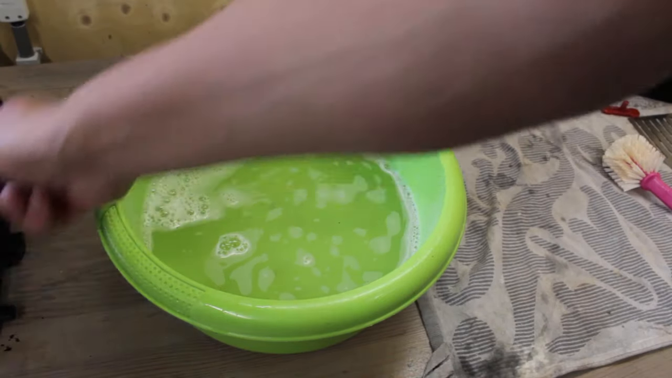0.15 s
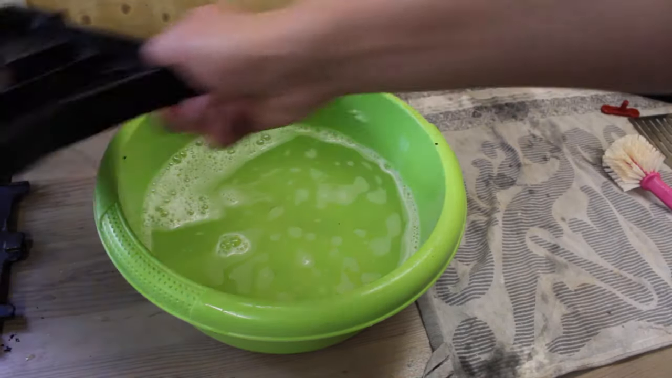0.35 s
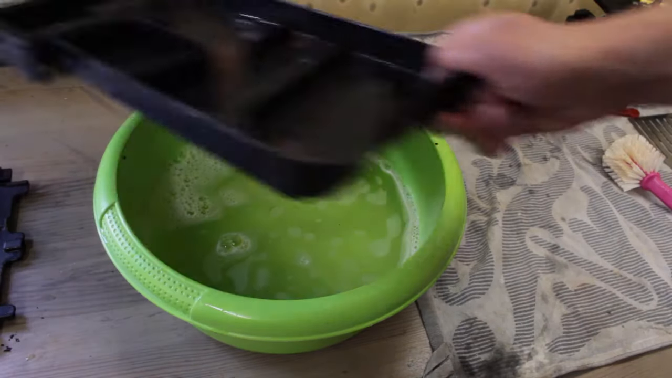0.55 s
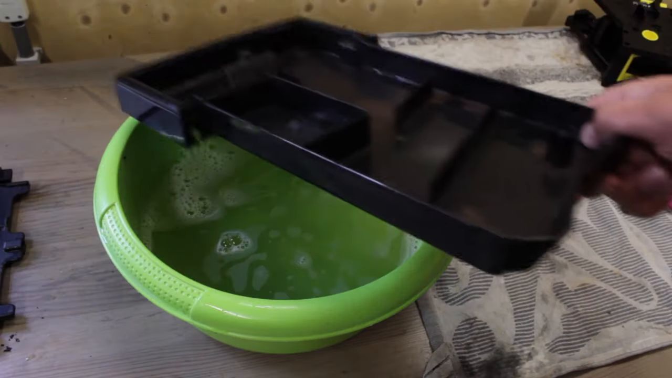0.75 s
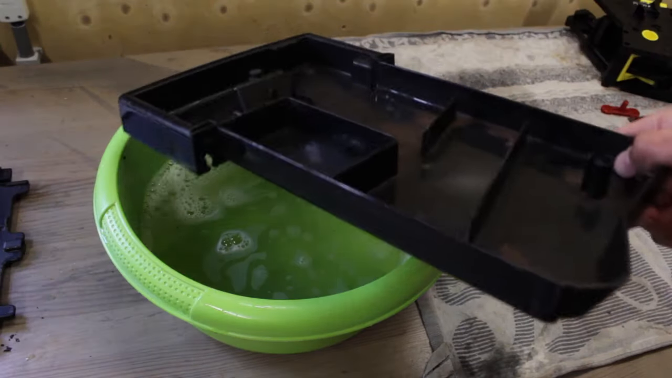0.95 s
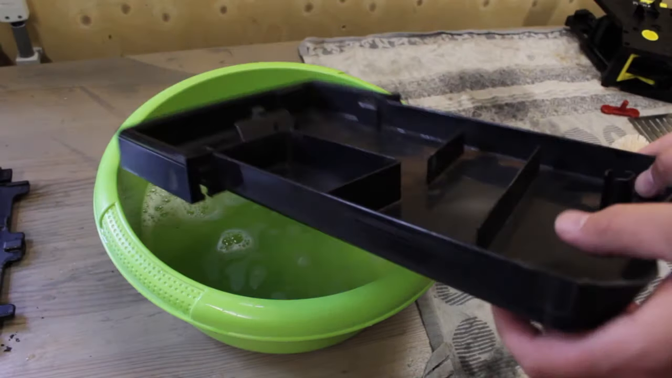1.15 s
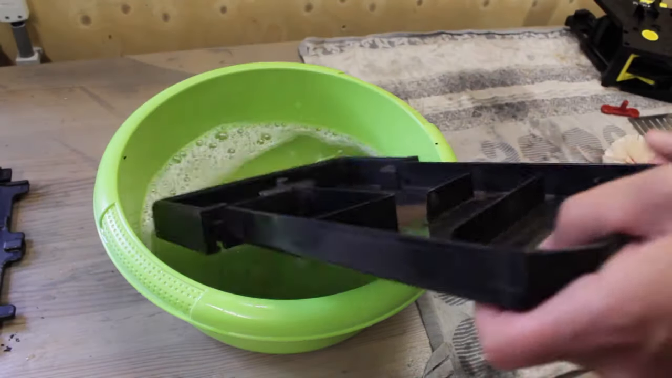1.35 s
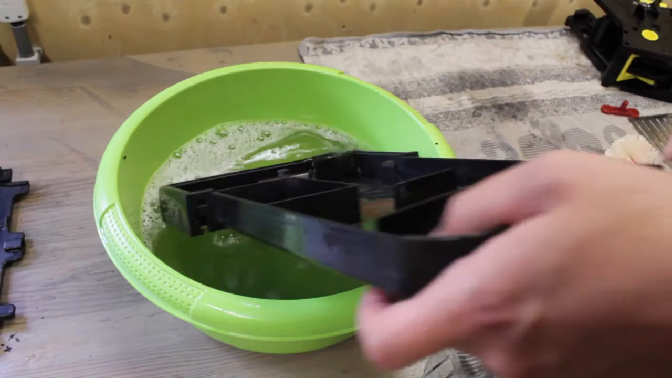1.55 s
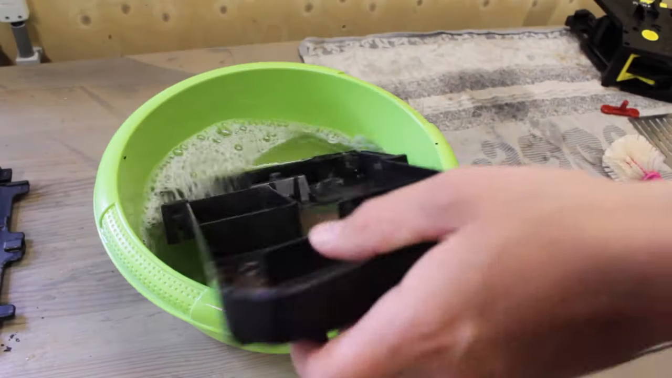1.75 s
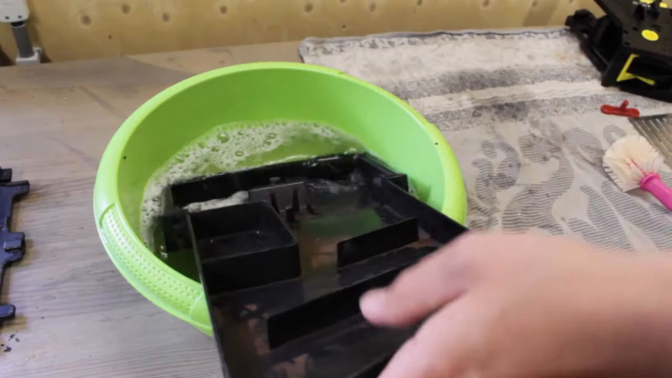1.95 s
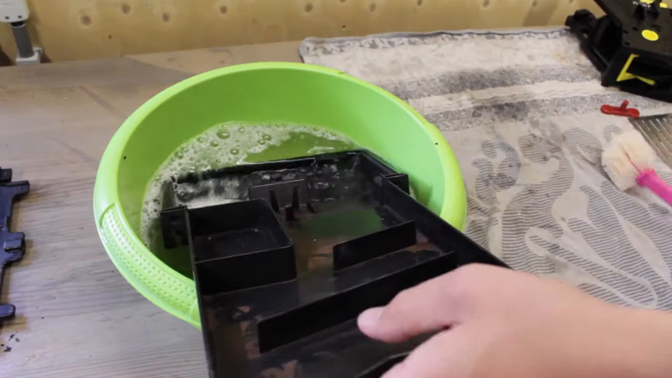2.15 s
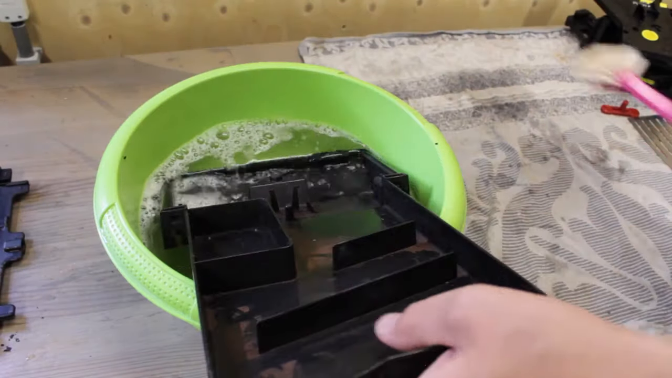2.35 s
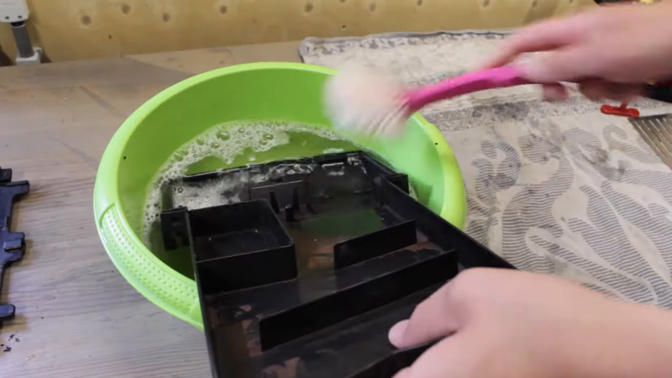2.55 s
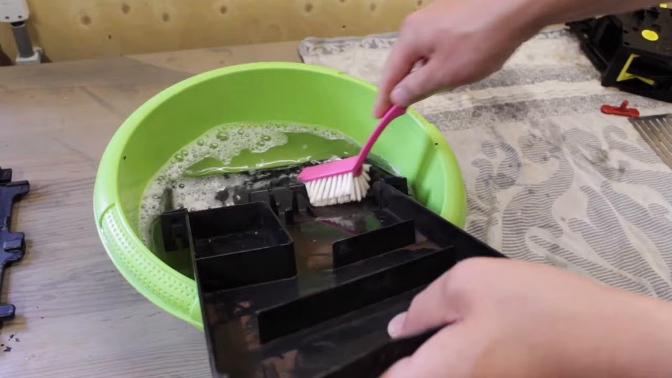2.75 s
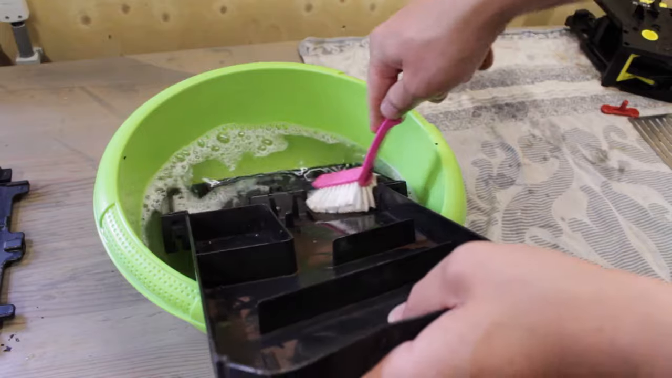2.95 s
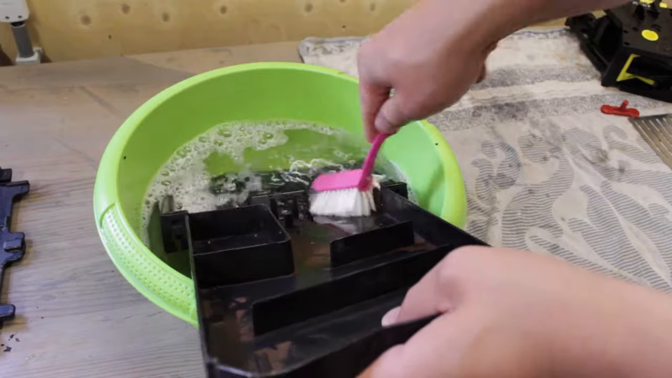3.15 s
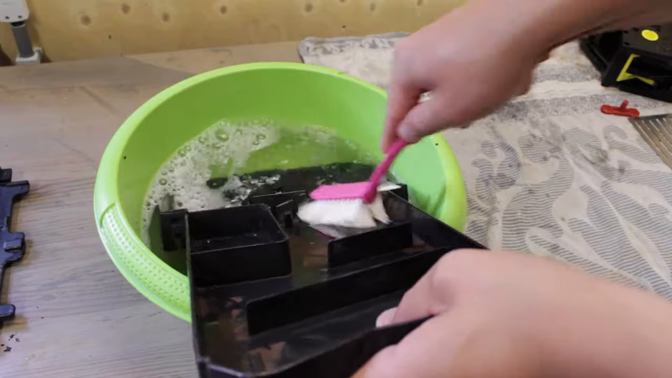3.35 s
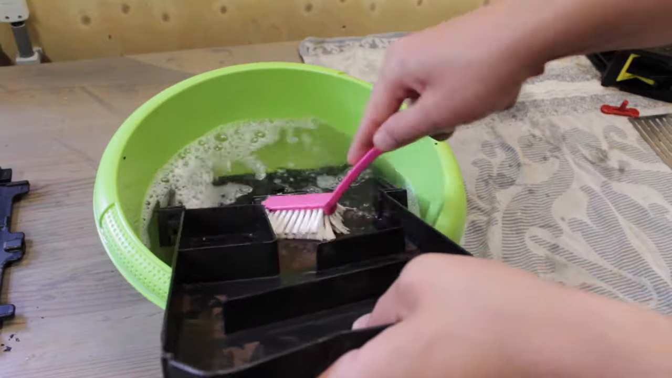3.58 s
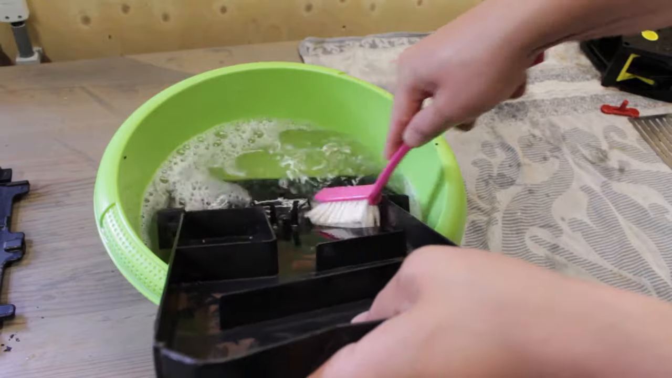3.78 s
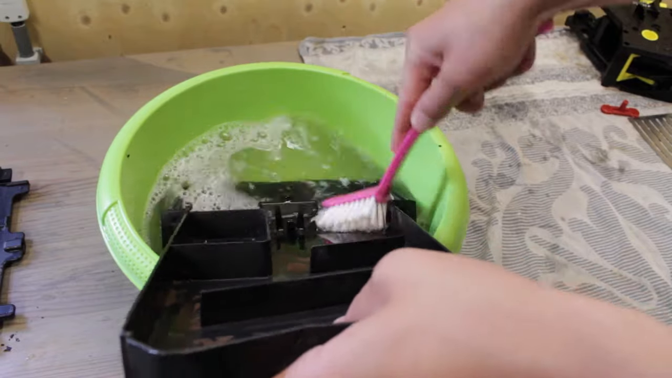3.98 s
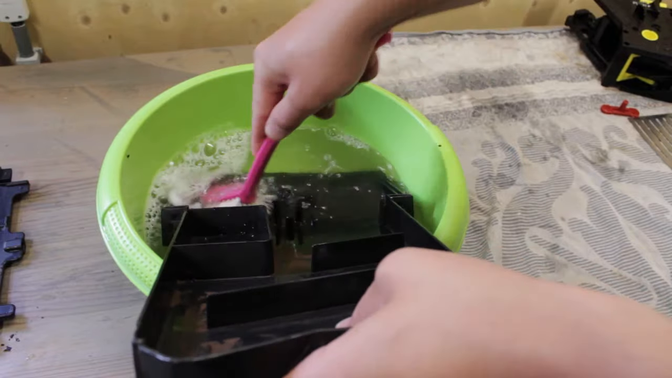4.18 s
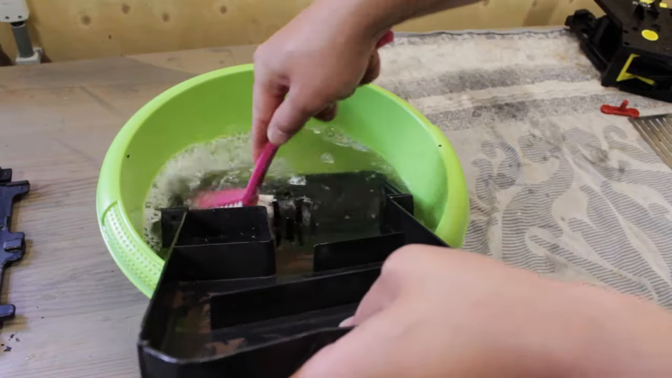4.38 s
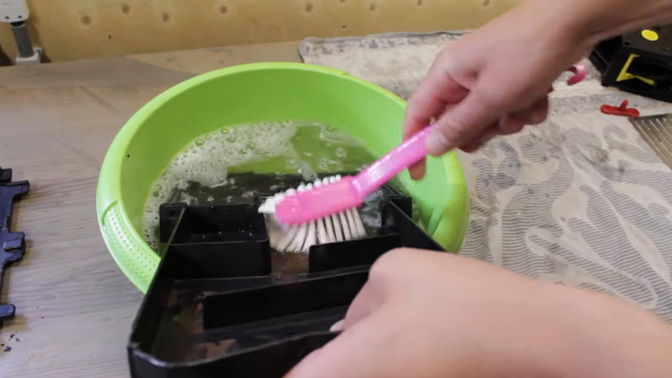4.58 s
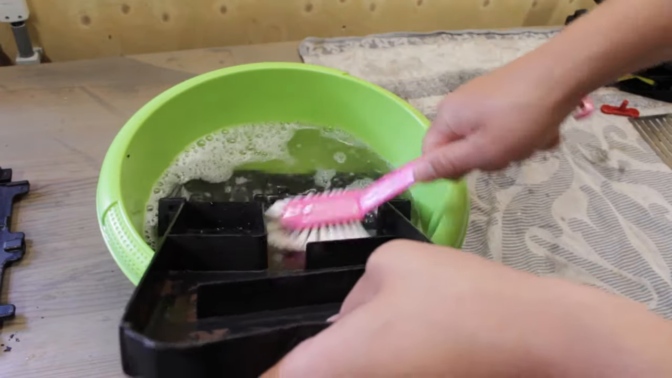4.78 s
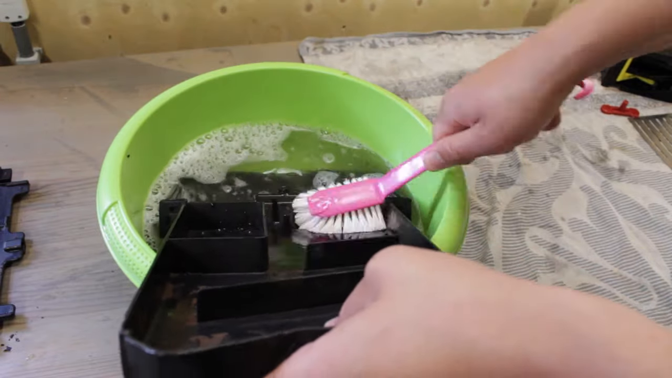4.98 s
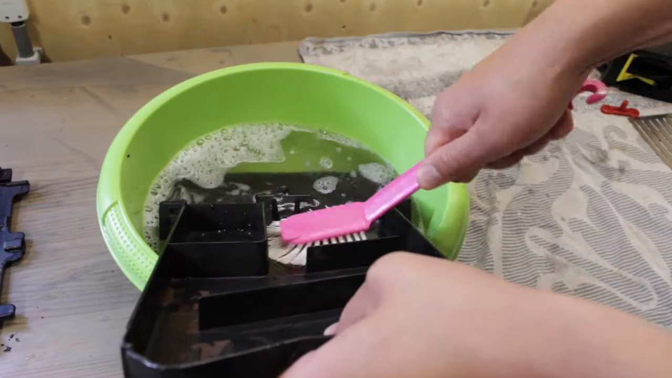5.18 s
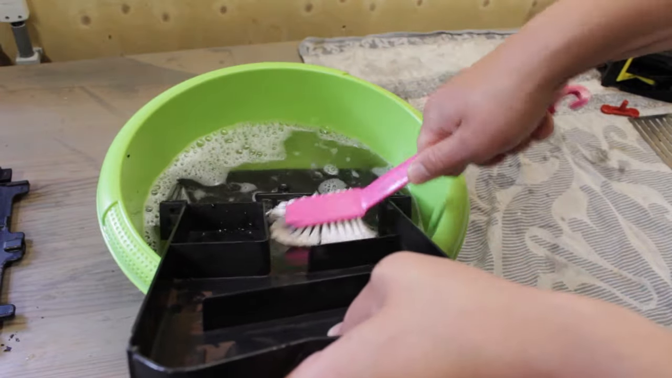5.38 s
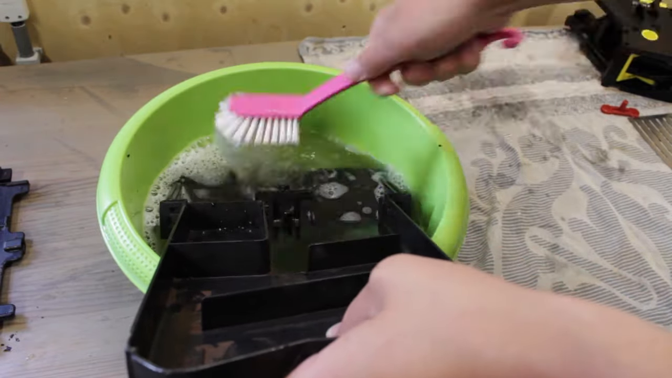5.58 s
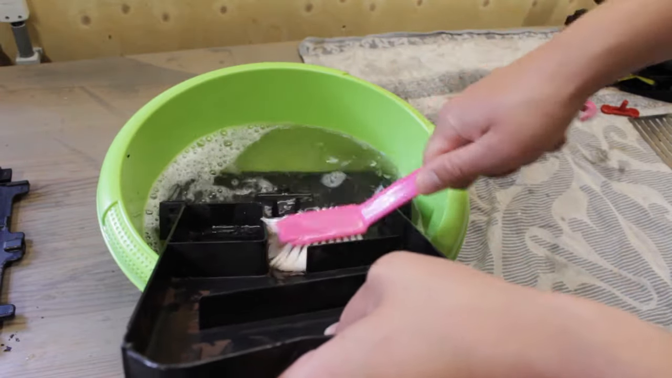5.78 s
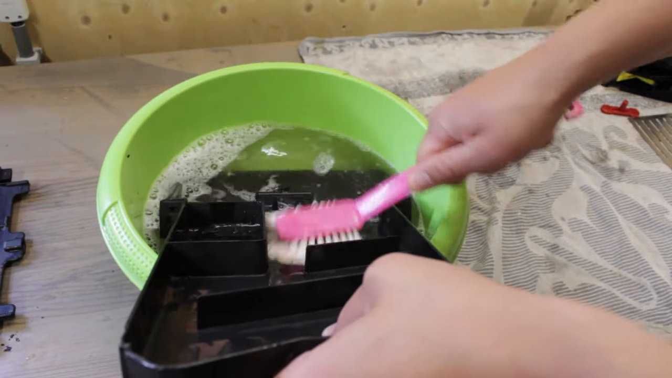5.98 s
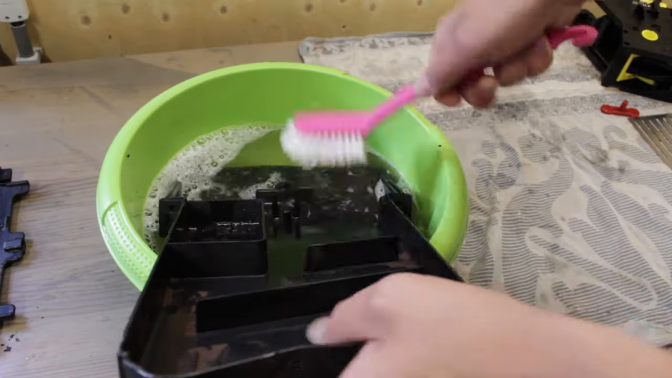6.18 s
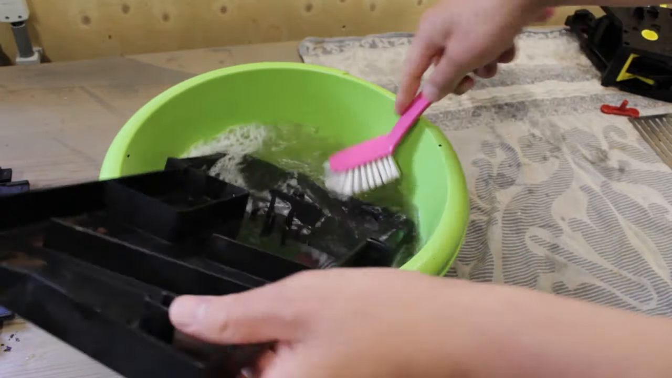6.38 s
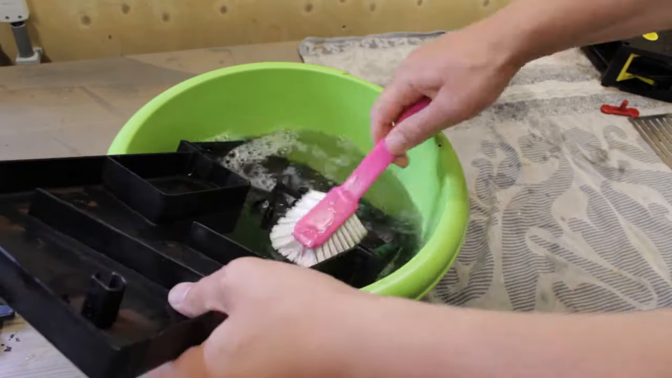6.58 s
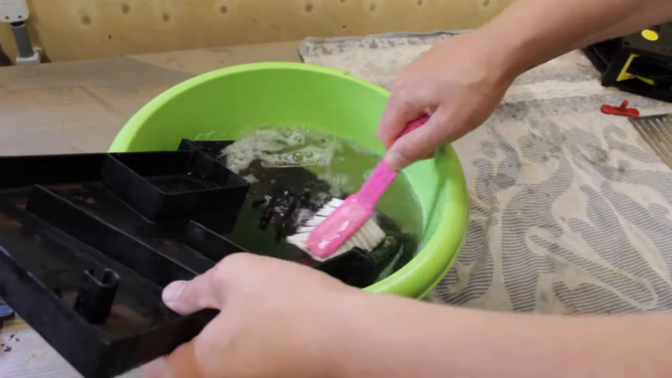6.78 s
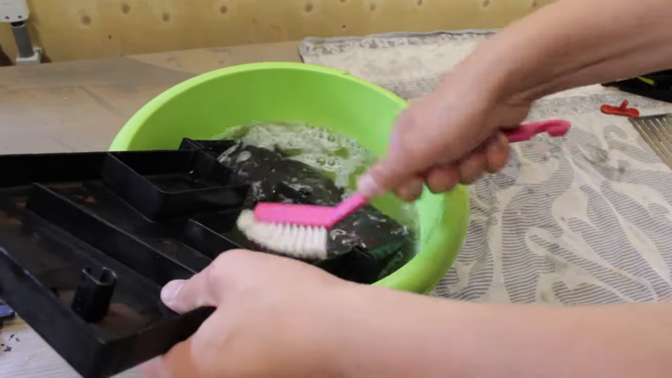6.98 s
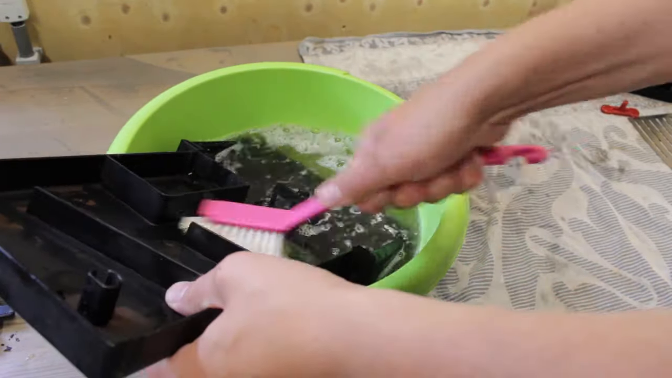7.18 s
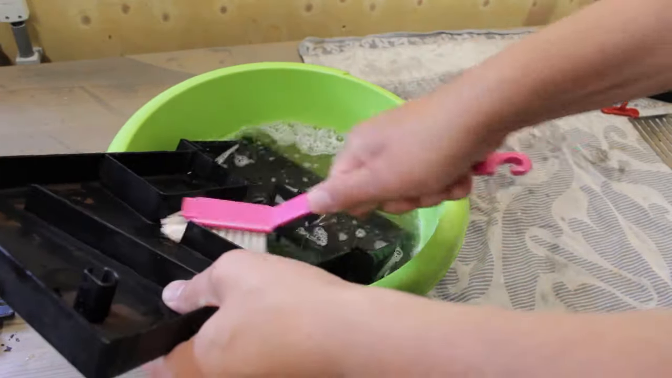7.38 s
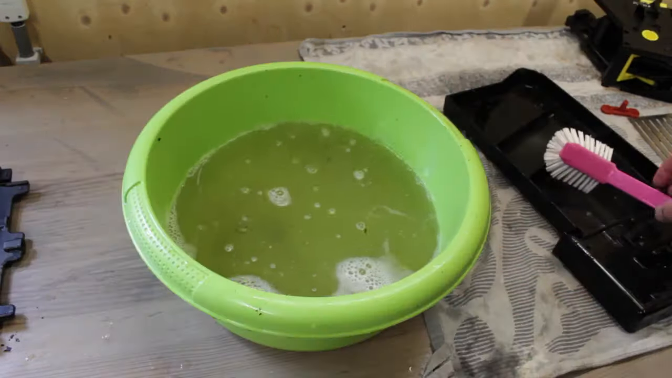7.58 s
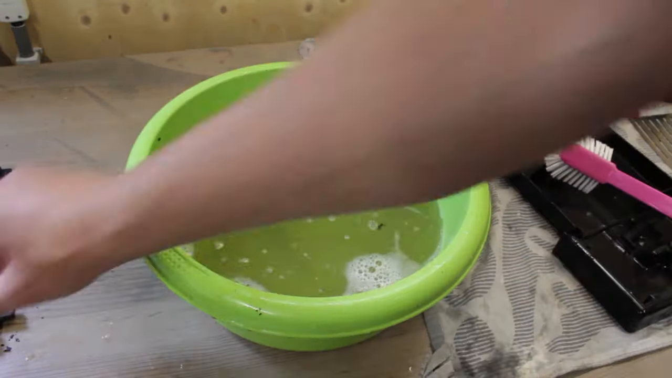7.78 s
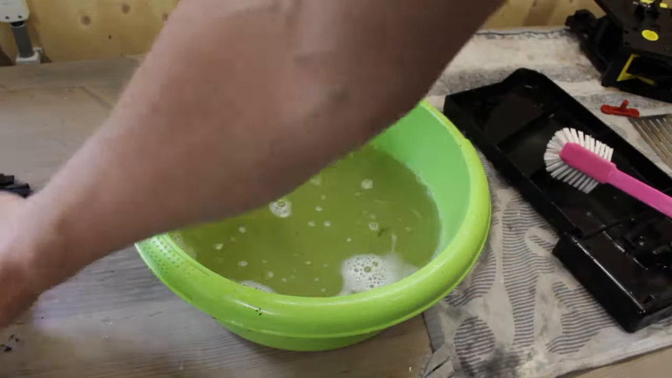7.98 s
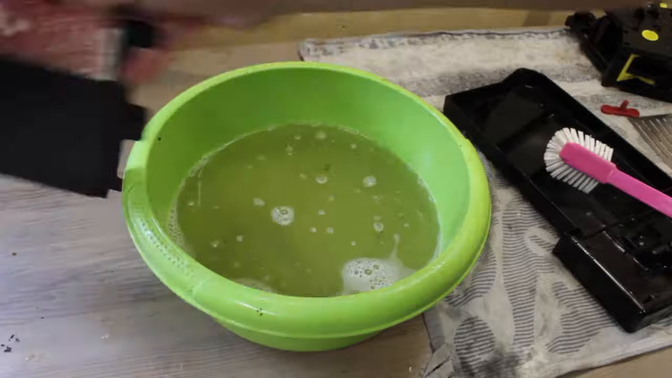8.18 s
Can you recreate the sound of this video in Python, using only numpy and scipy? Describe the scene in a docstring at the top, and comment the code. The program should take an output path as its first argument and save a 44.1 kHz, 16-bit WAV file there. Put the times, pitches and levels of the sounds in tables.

```python
"""A bump on the bench and small plastic ticks over a low hum: a hollow tray is lifted, then bumps into a basin of suds.
A stiff brush scrubs it: wet bristles hiss and flick, the head snaps against ribs, the floor booms, suds pop.
At the end tray and brush are put aside and the next part is picked up, in the quiet air of the workshop.
Blows are noise cracks with ringing modes, scrubbing is shaped random clicks and noise,
booms, bubbles and squeaks are sines with short envelopes."""
import sys
import numpy as np
from scipy import signal
from scipy.io import wavfile

SR = 44100
rng = np.random.default_rng(int(sys.argv[2]) if len(sys.argv) > 2 else 0)


def dump_mix(stems):
    """Bounce the given channels to the path in sys.argv[1] as a 16-bit WAV at rate SR."""
    frames = np.atleast_2d(stems).T  # one column per channel
    limited = np.clip(frames, -1, 1)  # hard clip at full scale
    pcm = np.round(limited * 32767).astype(np.int16)
    wavfile.write(sys.argv[1], SR, pcm)


N = 363384
TIME = np.arange(N) / SR

# snaps of the brush head on ribs; the last is the tray being put down:
# (t/s, level/dB, hardness/dB: treble over middle)
SNAPS = [(3.182, -33, 0.5), (3.305, -26.5, -24), (3.521, -15.5, -7.5), (3.5995, -26, -15),
         (3.646, -23, -10), (3.7971, -22, 4.5), (3.8418, -19.5, -2), (3.858, -33, -13), (3.879, -26, -6),
         (3.926, -14.5, -4.5), (4.014, -17, -2), (4.1173, -30, -4), (4.476, -29, -1), (4.7638, -38, 12.5),
         (4.8683, -21, -9.5), (4.9361, -19.5, -7), (5.0078, -21.5, -9), (5.0458, -27.5, 5.5),
         (5.0489, -18, -4.5), (5.097, -25.5, -9), (5.121, -15.5, 2.5), (5.2426, -23, -6), (5.354, -37.5, 9),
         (5.4499, -26, -9.5), (5.561, -39, 9), (5.697, -22.5, 2.5), (5.8027, -50, 14), (5.8225, -23.5, -6),
         (5.8919, -19, -7), (5.943, -29, -9), (6.0132, -23.5, -3.5), (6.022, -26.5, -0.5),
         (6.0766, -26, -8), (6.0898, -30.5, -0.5), (6.145, -22.5, -10), (6.29, -43, 14.5),
         (6.366, -19.5, -5.5), (6.442, -16, -9.5), (6.466, -15.5, -9), (6.5791, -24, -7),
         (6.7728, -31.5, 1), (7.052, -31.5, -4), (7.1823, -28, -5.5), (7.249, -26.5, -10),
         (7.333, -27, -1.5), (7.414, -32, -5), (7.427, -23.5, 4.5), (7.918, -42, 7.5)]
# light bristle contact between strokes: (t/s, level/dB)
CONTACT = [(2.7, -74), (2.93, -48.5), (3.2, -39.5), (3.48, -45.5), (4.3, -39.5), (4.8, -41.5), (5.4, -42),
           (5.75, -41.5), (6.55, -45.5), (6.8, -38), (7.465, -45), (7.475, -90), (7.545, -44.5),
           (7.63, -76)]
# modes of the tray struck on its face: (f/Hz, level/dB, t60/s)
TRAY_MODES = [(147.4, 8.5, 0.3), (372.5, 2.5, 0.2), (468, 2, 0.39), (591, -7, 0.52), (693, -3.5, 0.31),
              (880, 7, 0.1), (1118, -2, 0.13), (1400, 1, 0.092), (2350, -3, 0.079)]
# modes of the tray struck on its edge: (f/Hz, level/dB, t60/s)
EDGE_MODES = [(155.6, -4.5, 0.58), (306, -1.5, 0.29), (647.4, 6.5, 0.19), (725.4, 10.5, 0.18),
              (774, 11, 0.12), (904, 2, 0.17), (1437, 6, 0.12), (1644, 3, 0.1)]
# modes of the wet tray: (f/Hz, level/dB, t60/s)
WET_MODES = [(1172, -6, 0.069), (1895, 5.5, 0.045), (2191, 9, 0.034), (2563, -1, 0.086),
             (4440, 12.5, 0.013), (5180, 16.5, 0.0067)]
# modes of the tray's floor: (f/Hz, level/dB, t60/s)
FLOOR_MODES = [(338.6, -13.5, 0.12), (442.3, -3.5, 0.24), (505, -5, 0.58)]
# spectrum of a knock: (f/Hz, level/dB)
KNOCK_COLOUR = [(45, -44), (150, 15), (260, 0.5), (900, 4.5), (2400, -5.5), (4500, -17), (16000, -41)]
# spectrum of a snap or click: (f/Hz, level/dB)
SNAP_COLOUR = [(50, -62.5), (150, -6), (400, 5.5), (1300, 6), (2400, 12.5), (5200, 11), (7500, 8),
               (16000, 1.5)]

# borders of bass, middle and treble
KNOCK_SPLIT_HZ, SNAP_SPLIT_HZ = (220, 1770), (810, 3530)

EDGES = np.geomspace(40, 17000, 24)
# narrow bands: (centre Hz, filter)
BANDS = [(np.sqrt(lo * hi), signal.butter(2, [lo, hi], "band", fs=SR, output="sos"))
         for lo, hi in zip(EDGES, EDGES[1:])]


def from_db(db):
    """Amplitude factor of a level in dB."""
    return 10 ** (np.asarray(db) / 20)


def rms(x):
    """Root mean square, kept above zero."""
    return np.sqrt(np.mean(x ** 2) + 1e-20)


def at_hz(points, hz):
    """Read a table along a log-frequency axis."""
    table = np.array(points)
    return np.interp(np.log(hz), np.log(table[:, 0]), table[:, 1])


def level_curve(rows):
    """Gain at every sample from rows of (s, dB)."""
    return from_db(np.interp(TIME, *np.transpose(rows)))


def wander(rate_hz):
    """A continuous random course with a spread of about 1."""
    steps = rng.standard_normal(N // 100)
    return np.interp(TIME * rate_hz, np.arange(len(steps)), steps)


def fade(t, t60):
    """Free decay, a thousandfold in t60."""
    return np.exp(-np.log(1000) * t / t60)


def cut(x, hz, kind):
    """Low-, high- or band-pass from a third-order Butterworth design."""
    return signal.sosfilt(signal.butter(3, hz, kind, fs=SR, output="sos"), x)


def add(out, s, sound):
    """Mix a sound in at time s."""
    i = int(np.clip(s * SR, 0, N - 1))
    out[i:i + len(sound)] += sound[:N - i]


def coloured(source, colour, patchy_db=0, patch_rate_hz=75):
    """Shape two draws of a source band by band; if patchy, each band swells on its own; rms 1."""
    stroke_colour_hz = 13   # how often the colour of the bristles changes
    draws, out = (source(), source()), 0
    for k, (hz, sos) in enumerate(BANDS):
        patch = 1
        if patchy_db:
            patch = from_db(patchy_db * (wander(patch_rate_hz) + wander(stroke_colour_hz)))
        out = out + from_db(at_hz(colour, hz)) * patch * signal.sosfilt(sos, draws[k % 2])
    return out / rms(out)


def resonate(x, hz, width_hz):
    """One resonance with gain 1 on top."""
    r = np.exp(-np.pi * width_hz / SR)
    feedback = [1, -2 * r * np.cos(2 * np.pi * hz / SR), r * r]
    return signal.lfilter((1 - r * r) / 2 * np.array([1, 0, -1]), feedback, x)


def mode_width(t60):
    """Bandwidth in Hz of a mode that decays in t60: the longer it rings, the narrower."""
    return np.log(1000) / np.pi / t60


def ringing(modes, t, spread_db):
    """Struck modes, each a little detuned at every blow; spread_db weights them anew."""
    detune, out = .02, 0
    for hz, db, t60 in modes:
        weight = rng.choice([-1, 1]) * from_db(db + spread_db * rng.normal())
        pitch = hz * (1 + detune * rng.normal())
        out = out + weight * np.sin(2 * np.pi * pitch * t) * fade(t, t60)
    return out


def blows(rows, modes, colour, split_hz, bass_db, ring_db, window=0.017, crack_t60=.024, tail_db=-15,
          linger=1, size=SR // 2):
    """Each blow is a crack of crowded, damped modes, a few clear modes and a diffuse tail."""
    # how long a blow lingers in tray and workshop, scaled by linger: (f/Hz, t60/s)
    linger_t60 = [(150, 0.52), (700, 0.37), (9000, 0.13)]
    spike, spike_t60 = 0.71, 0.0016   # the first instant of contact stands out of the crack
    t, out = np.arange(size) / SR, np.zeros(N)
    white, body = rng.standard_normal((2, len(rows), len(t))), 0
    for k, (hz, sos) in enumerate(BANDS):
        # bass dies more slowly
        crack = fade(t, crack_t60 * (2000 / hz) ** 0.06) + spike * fade(t, spike_t60)
        tail = from_db(tail_db) * fade(t, linger * at_hz(linger_t60, hz))
        weight = from_db(at_hz(colour, hz) + 1.3 * rng.standard_normal((len(rows), 1)))
        body = body + weight * signal.sosfilt(sos, white[k % 2] * (crack + tail))
    head = slice(0, int(window * SR))   # levels are set over this opening
    for (s, db, hardness_db), dense in zip(rows, body):
        clear = ringing(modes, t, spread_db=0)
        sound = dense / rms(dense[head]) + from_db(ring_db) * clear / rms(clear[head])
        # the struck body sets the share of bass, the hardness of the contact that of treble
        bass = cut(sound, split_hz[0], "low")
        middle = cut(sound, split_hz, "band")
        treble = cut(sound, split_hz[1], "high")
        for share_db, part in ((bass_db, bass), (0, middle), (hardness_db, treble)):
            add(out, s, from_db(db + share_db) * part / rms(part[head]))
    return out


def flicks(per_s, spread_db, smooth):
    """Bristles slip one by one and in tufts, over the smooth hiss of the wet film."""
    sizes = from_db(spread_db * np.minimum(rng.exponential(1, N), 4)) * rng.choice([-1, 1], N)
    clicks = sizes * (rng.random(N) < per_s / SR)
    return clicks / rms(clicks) + smooth * rng.standard_normal(N)


def shuffle(s, length, db, band_hz):
    """A short, lumpy swell: the brush gurgling through standing water, or a part scuffing over the bench."""
    lumps = cut(flicks(per_s=900, spread_db=3, smooth=1 / 2), band_hz, "band")
    return from_db(db) * np.exp(-2 * ((TIME - s) / length) ** 2) * lumps / rms(lumps)


def workshop_air():
    """The quiet air of the workshop: steady coloured noise."""
    # spectrum of the air: (f/Hz, level/dB)
    air_colour = [(45, -18), (100, -19), (280, -4), (1800, -10), (4200, -17), (15000, -27.5)]
    return from_db(-54) * coloured(lambda: rng.standard_normal(N), air_colour)


def hum_and_rumble():
    """The tray's lowest bending mode hums; sliding plastic makes basin and bench rumble."""
    # low hum of the tray, carried and ringing on after knocks: (t/s, level/dB)
    hum_levels = [(0, -58), (.55, -43.5), (.75, -49.5), (.9, -36), (1.3, -59), (1.48, -46), (1.9, -60),
                  (2.12, -43), (2.5, -77)]
    # plastic sliding over basin rim and bench: (t/s, level/dB)
    rumble_levels = [(1.35, -101.5), (1.6, -41), (1.72, -51), (1.8, -34), (2.05, -46), (2.35, -67),
                     (7.96, -88), (8.05, -42), (8.14, -77)]
    hum = cut(resonate(rng.standard_normal(N), 160, 14), [120, 210], "band")
    rumble = cut(resonate(rng.standard_normal(N), 80, 45), [50, 300], "band")
    return level_curve(hum_levels) * hum / rms(hum) + level_curve(rumble_levels) * rumble / rms(rumble)


def suds(gain_db, cycles, count):
    """Tiny foam bubbles tick wherever the brush stirs; each dies away within a few cycles."""
    t, out, stir = np.arange(SR // 20) / SR, np.zeros(N), level_curve(CONTACT)
    for when, size, strength in rng.random((count, 3)):
        hz = 4000 * 3.4 ** size
        pop = np.sin(2 * np.pi * hz * t) * fade(t, cycles / hz)
        level = stir[int(when * N)] * from_db(gain_db + 18 * strength ** 2)
        add(out, when * N / SR, level * pop)
    return out


def plops(rise_s, t60):
    """Brush or tray dips and traps a pocket of air, which rings as it closes."""
    # air pockets closing in the water: (t/s, f/Hz, level/dB)
    pockets = [(1.811, 2150, -15), (3.448, 2270, -13), (4.3368, 2290, 6.5), (5.663, 4360, -25)]
    t, out = np.arange(SR // 10) / SR, np.zeros(N)
    swell = 1 - np.exp(-(t / rise_s) ** 2)
    for s, hz, db in pockets:
        tone = np.sin(2 * np.pi * hz * t) * fade(t, t60)
        echo = resonate(rng.standard_normal(len(t)), hz, 570)
        echo = 0.2 * echo / rms(echo) * fade(t, 0.038)
        add(out, s, from_db(db) * swell * (tone + echo))
    return out


def squeaks(sag, jitter):
    """A skidding plastic edge sticks and slips at one resonance: a short, rough tone that sags as it slows."""
    # plastic edges skidding on basin and bench: (t/s, f/Hz, peak level/dB, swell/s)
    skid_rows = [(1.406, 1160, -23.5, 0.0095), (8.026, 5350, -18, 0.0029), (8.075, 3400, -38, 0.015),
                 (8.113, 1650, -42, .011)]
    t, out = np.arange(SR // 10) / SR, np.zeros(N)
    for s, hz, db, swell_s in skid_rows:
        pitch = hz * (1 - sag * t) * (1 + jitter * wander(700)[:len(t)])
        swell = t / swell_s * np.exp(1 - t / swell_s)
        add(out, s, from_db(db) * swell * np.sin(2 * np.pi * np.cumsum(pitch) / SR))
    return out


def dry_clicks():
    """Dry clicks of brush, tray rim and parts: cracks with a few short modes."""
    # clicks: (t/s, level/dB, hardness/dB)
    click_rows = [(1.385, -38.5, -5), (1.4063, -28, 0), (2.741, -38, -5.5), (2.853, -42, -1.5),
                  (7.594, -26.5, 7.5), (8.017, -35, 2), (8.027, -33, 8.5), (8.176, -37.5, -1),
                  (8.2235, -24.5, 6.5)]
    # modes of the clicks: (f/Hz, level/dB, t60/s)
    click_modes = [(1120, -5, .1), (1660, -6, .12), (2300, -6, .08), (3300, -2, .09), (5450, -1, .07)]
    return blows(click_rows, click_modes, SNAP_COLOUR, SNAP_SPLIT_HZ, bass_db=-7.5, ring_db=-6, linger=0.64)


def grip_ticks():
    """The tray shifts in the grip and ticks lightly with its edge modes."""
    # ticks: (t/s, level/dB)
    tick_rows = [(.161, -38.5), (.225, -45.5), (.278, -41), (.366, -45.5), (.412, -45.5), (.5, -45.5),
                 (.539, -42), (0.722, -45.5)]
    hardness_db = -4.5
    return blows([(s, db, hardness_db) for s, db in tick_rows], EDGE_MODES, KNOCK_COLOUR, KNOCK_SPLIT_HZ,
                 bass_db=-4, ring_db=1.0)


def grip_thumps():
    """The tray is gripped or pushed down: thumps heavy in bass."""
    # thumps: (t/s, level/dB, hardness/dB)
    thump_rows = [(.906, -33.5, 1.5), (2.876, -30.5, -26)]
    return blows(thump_rows, TRAY_MODES, KNOCK_COLOUR, KNOCK_SPLIT_HZ, bass_db=5.5, ring_db=-2.5)


def tray_knocks():
    """Knocks on the tray, and two dull thuds at the end, all with the modes of the tray's face."""
    # knocks and thuds: (t/s, level/dB, hardness/dB)
    knock_rows = [(.831, -14, -5), (1.0426, -25.5, -8), (7.995, -47, -4), (8.031, -36, -12)]
    return blows(knock_rows, TRAY_MODES, KNOCK_COLOUR, KNOCK_SPLIT_HZ, window=0.033, bass_db=-9.5, ring_db=-1.0)


def basin_knocks():
    """The tray bumps on bench and basin: short cracks with the modes of its edge."""
    # bumps: (t/s, level/dB, hardness/dB)
    bump_rows = [(.001, -15.5, -12.5), (.01, -23, -5.5), (.072, -27.5, -20), (1.456, -25, -13),
                 (1.5774, -23, -7), (1.767, -23.5, -4.5), (1.824, -27, -4), (1.876, -27.5, -4),
                 (1.9146, -28, -5.5), (1.942, -24, -6), (1.9965, -10.5, -7), (2.0338, -14.5, -12)]
    # spectrum of a bump: (f/Hz, level/dB)
    bump_colour = [(45, -41), (150, 8), (260, -4.5), (850, 7), (2400, -4.5), (4500, -19.5), (16000, -44.5)]
    return blows(bump_rows, EDGE_MODES, bump_colour, KNOCK_SPLIT_HZ, window=0.015, bass_db=-17.5,
                 crack_t60=0.011, ring_db=-3, tail_db=-15, linger=0.96)


def snap_cracks():
    """Brush head on rib, at last the tray put down: a bright crack with the modes of the wet tray."""
    return blows(SNAPS, WET_MODES, SNAP_COLOUR, SNAP_SPLIT_HZ, window=0.015, bass_db=-16, crack_t60=0.016,
                 ring_db=-2.5, tail_db=-10, linger=0.36, size=SR // 5)


def floor_booms(rise_s, gain_db):
    """The tray's floor answers with a thud and a hollow boom of wobbling, sagging pitch."""
    # hollow booms of the floor, under the brush and as the tray is put down:
    # (t/s, peak level before gain_db/dB, f/Hz)
    boom_rows = [(3.646, -18.5, 482), (4.06, -25.5, 465), (4.477, -16.5, 458), (5.05, -20, 463),
                 (5.579, -20.5, 433), (5.701, -19, 517), (5.832, -15.5, 444), (5.898, -12, 460),
                 (5.963, -16.5, 441), (6.03, -19, 454), (6.16, -23.5, 468), (6.466, -10.5, 453),
                 (6.628, -23, 414), (6.788, -20, 446), (7.416, -23, 460), (7.595, -25.5, 395),
                 (7.916, -18.5, 476)]
    snap_boom_db, snap_boom_hz = -31, 494.8   # the lighter boom at every snap, also before gain_db
    bend, bend_s, wobble = 0.053, 0.014, .025   # the boom starts sharp and sags
    boom_t60, thud_db, floor_db = 0.16, -12, -2
    t, out = np.arange(SR // 4) / SR, np.zeros(N)
    knots = t[::SR // 80]
    snap_booms = [(s, snap_boom_db, snap_boom_hz) for s, _, _ in SNAPS]
    for s, db, hz in list(boom_rows) + snap_booms:
        wobbling = wobble * np.interp(t, knots, rng.normal(size=knots.shape))
        pitch = hz * (1 + bend * np.exp(-t / bend_s) + wobbling)
        tone = np.sin(2 * np.pi * np.cumsum(pitch) / SR)
        thud = cut(rng.standard_normal(len(t)), [330, 750], "band")
        floor = ringing(FLOOR_MODES, t, spread_db=9.5)
        mix = tone + from_db(thud_db) * thud / rms(thud) + from_db(floor_db) * floor
        boom = mix * (1 - np.exp(-t / rise_s)) * fade(t, boom_t60)
        add(out, s, from_db(db + gain_db) * boom / np.abs(boom).max())
    return out


def squelches(count):
    """Now and then a wet tuft springs off an edge; each rings briefly at one of count pitches."""
    cycles, out = 20, 0   # decay time in cycles
    slips, dealt = flicks(per_s=260, spread_db=3, smooth=0), rng.integers(0, count, N)
    for k, hz in enumerate(np.geomspace(1300, 6000, count)):
        ring = resonate(slips * (dealt == k) + 1e-18, hz, mode_width(cycles / hz))
        out = out + ring / np.sqrt(hz)
    return out / rms(out)


def walls(x, count=3):
    """Thin walls and ribs ring briefly in crowded modes; which of them answers keeps changing."""
    ring_s, ring_db = .03, 1
    shifts_per_s = 11   # how often the answer shifts
    t, rung = np.arange(int(ring_s * SR)) / SR, x
    for response in rng.standard_normal((count, len(t))) * fade(t, ring_s):
        wall = signal.oaconvolve(x, response / np.linalg.norm(response))[:N]
        rung = rung + from_db(ring_db) * np.tanh(wander(shifts_per_s)) * wall
    return rung * rms(x) / rms(rung)


def rubbing_power():
    """Power of drag, hiss and spray: light contact swells in swishes, dips before each snap and scrapes after it."""
    # the brush leaves the tray: (t at the middle/s, length/s)
    gaps = [(3.825, .025), (4.092, 0.022), (4.59, 0.038), (5.532, 0.074), (5.655, 0.072), (6.27, 0.021)]
    # soft swishes: first the tray rubbing the basin rim, then the brush's sweeps:
    # (t at the middle/s, length/s, hiss level/dB, tilt from drag to spray/dB)
    swish_rows = [(1.38, 0.27, -54, -10), (1.737, .14, -47, -8), (2.784, 0.041, -32, -3),
                  (3.015, 0.06, -34.5, -6), (3.083, 0.056, -24.5, 0.5), (3.233, 0.021, -29, 6),
                  (3.287, 0.02, -30, 2), (3.354, 0.026, -28.5, 6), (3.428, 0.036, -24, 4.5),
                  (3.592, 0.039, -29, 3), (3.642, 0.016, -20, 4), (3.69, 0.026, -30.5, 6),
                  (3.747, 0.028, -30.5, 4), (3.794, 0.018, -28, -4), (4.154, 0.027, -24.5, 4.5),
                  (4.21, 0.04, -31.5, 0.5), (4.258, 0.025, -24.5, 5.5), (4.394, 0.0092, -32.5, 8),
                  (4.517, 0.058, -28, 4.5), (4.668, 0.05, -34.5, 1.5), (5.211, 0.023, -31, 2.5),
                  (5.286, 0.015, -27.5, 4), (5.371, 0.015, -37.5, 1), (5.577, 0.0084, -27.5, -5),
                  (6.23, 0.015, -29, 6), (6.313, 0.027, -35.5, 2), (6.73, .02, -33.5, 1),
                  (6.865, 0.023, -32, 3), (6.936, 0.011, -22.5, 5.5), (6.97, 0.015, -23.5, 7),
                  (7.075, 0.043, -37, 10), (7.161, 0.014, -30, -1)]
    # share of drag, hiss and spray in light contact [dB]
    contact_mix = [0.36, -1.5, -8.5]
    gap_db = -14.5
    dip_s, dip_db = 0.029, -3   # the rubbing lightens before a snap
    lead_s, lead_db = 0.0098, -18   # a flick just ahead of the snap; level relative to it
    scrape_s, scrape_db, scrape_follows = 0.022, -31, 0.24   # level after a 0 dB snap, share of the snap's dB
    drag_db, spray_db = -3.5, -7.5   # in a swish, beside the hiss
    pressure_db, pressure_per_s = 1.5, 70
    contact, t = level_curve(CONTACT) ** 2, np.arange(SR // 5) / SR
    for s, _, _ in SNAPS:
        contact[(TIME > s - dip_s) & (TIME < s)] *= from_db(dip_db) ** 2
    for s, length in gaps:
        contact *= from_db(gap_db * np.exp(-(2 * (TIME - s) / length) ** 2)) ** 2
    for s, db, _ in SNAPS:
        flick = from_db(db + lead_db) ** 2 * np.exp(-(t / lead_s) ** 2)
        scrape = from_db(scrape_db + scrape_follows * db) ** 2 * np.exp(-(t / scrape_s) ** 2)
        add(contact, s - lead_s, flick)
        add(contact, s, scrape)
    power = np.outer(from_db(contact_mix) ** 2, contact)
    for s, length, db, tilt_db in swish_rows:
        near = np.abs(TIME - s) < 2 * length
        swell = np.exp(-(2 * (TIME[near] - s) / length) ** 2)
        levels = [db + drag_db - tilt_db, db, db + spray_db + tilt_db]
        power[:, near] += np.outer(from_db(levels) ** 2, swell)
    return power * from_db(pressure_db * wander(pressure_per_s)) ** 2   # the hand's pressure wavers


def rubbing():
    """Soft swishes on the rim, then scrubbing: drag with the tray's resonances, hiss and spray swell and fade."""
    # spectra of drag, hiss and spray: (f/Hz, level/dB)
    drag_colour = [(60, -44), (110, 2), (250, -11.5), (450, -4), (1500, -4.5), (2200, -2.5), (3500, -5.5),
                   (7000, -26)]
    hiss_colour = [(1500, -39), (3200, 2.5), (5000, 6), (8000, 2), (10500, 11), (13000, -14.5),
                   (16000, -48)]
    spray_colour = [(6000, -45), (10000, 1), (13000, -14), (16000, -3.5)]
    patch_db, grip_db, squelch_db = 2.4, 2.9, -5
    drag_power, hiss_power, spray_power = rubbing_power()
    drag = coloured(lambda: flicks(per_s=900, spread_db=3.0, smooth=.5), drag_colour)
    # the rubbing favours now one mode of the tray, now another
    wet = sum(from_db(3.5 * wander(40)) * resonate(drag, hz, mode_width(t60)) for hz, _, t60 in WET_MODES)
    drag = drag + 1.5 * wet
    # the floor hums hollowly under every stroke
    floor = sum(from_db(db) * resonate(drag, hz, mode_width(t60)) for hz, db, t60 in FLOOR_MODES)
    drag = drag + 10.3 * floor
    hiss = coloured(lambda: flicks(per_s=1900, spread_db=2.5, smooth=1 / 2), hiss_colour, patchy_db=patch_db)
    spray = coloured(lambda: flicks(per_s=920, spread_db=3, smooth=1 / 2), spray_colour, patchy_db=patch_db)
    rub = np.sqrt(drag_power) * drag / rms(drag)
    rub = rub + np.sqrt(hiss_power) * walls(hiss) + np.sqrt(spray_power) * walls(spray)
    grip = from_db(grip_db * wander(330))   # tufts catch and let go
    return grip * rub + from_db(squelch_db) * np.sqrt(drag_power) * squelches(count=20)


def scene():
    """Knocks, snaps, scrubbing and suds over the quiet air of the workshop, in one channel."""
    background = workshop_air() + hum_and_rumble()
    water = suds(gain_db=4, cycles=14, count=400) + plops(rise_s=0.00099, t60=0.012)
    scuff = shuffle(s=8.04, length=0.04, db=-30.5, band_hz=(160, 520))
    skids = squeaks(sag=.3, jitter=0.056) + scuff
    knocks = grip_ticks() + grip_thumps() + tray_knocks() + basin_knocks()
    # snaps and clicks are kept free of deep bass
    sharp = cut(snap_cracks() + dry_clicks(), 165, "high")
    gurgle = shuffle(s=3.085, length=0.074, db=-30.5, band_hz=(450, 1900))
    strokes = rubbing() + gurgle + floor_booms(rise_s=0.0013, gain_db=-3.0)
    return (background + water + skids + knocks + sharp + strokes)[None]


def record(dry):
    """The microphone signal clips at full scale; a steep low-pass cuts the top at 16.1 kHz."""
    low_pass = signal.ellip(10, .2, 70, 16100, fs=SR, output="sos")
    return signal.sosfilt(low_pass, np.clip(dry, -1, 1))


dry = scene()
out = record(dry)
dump_mix(out)
```